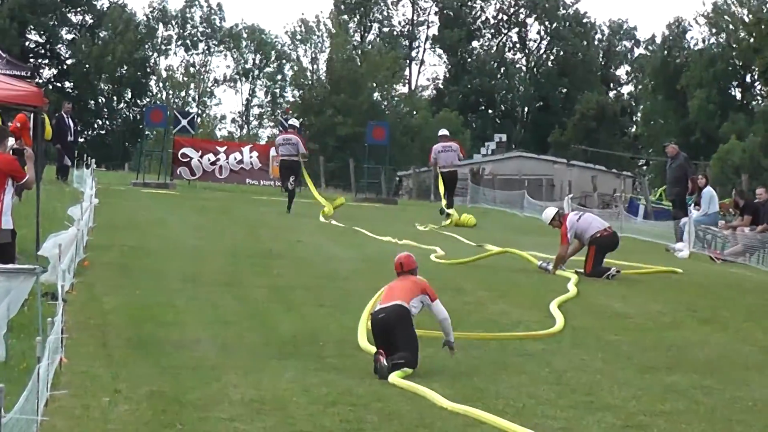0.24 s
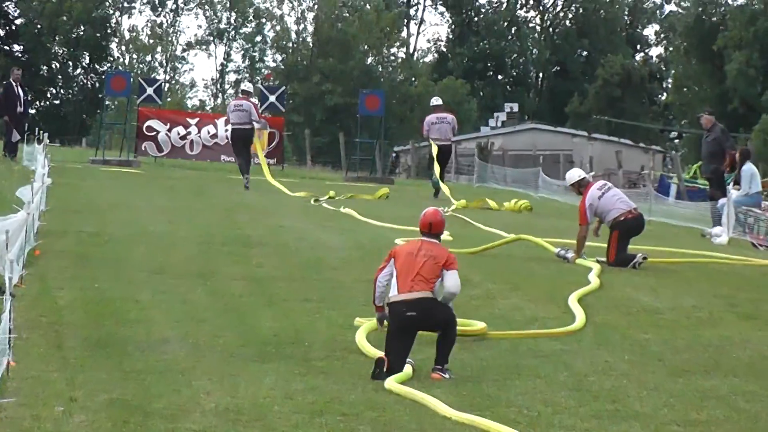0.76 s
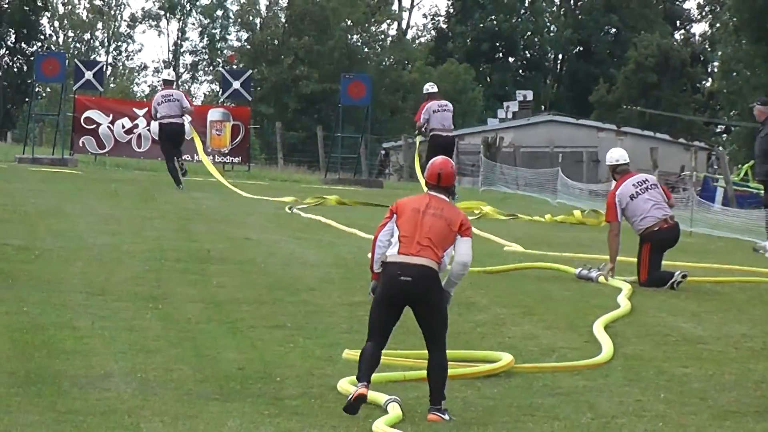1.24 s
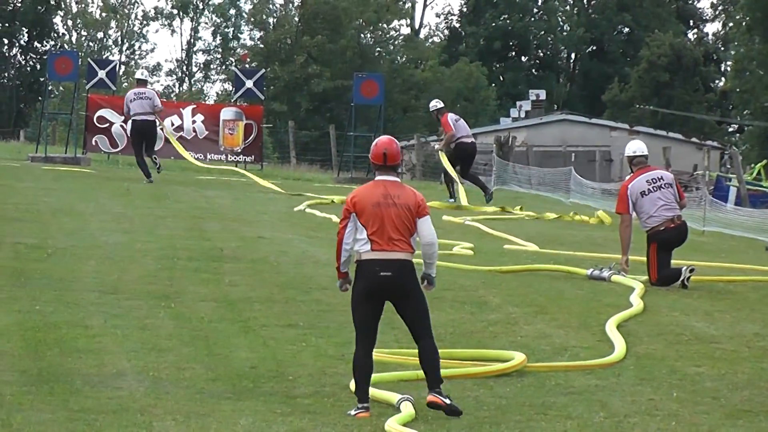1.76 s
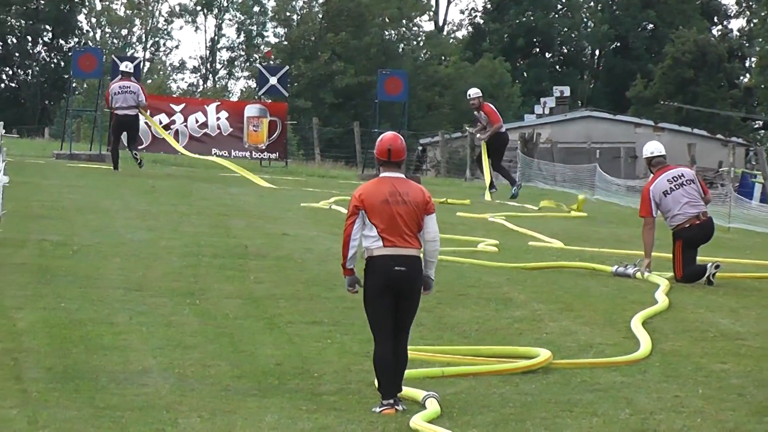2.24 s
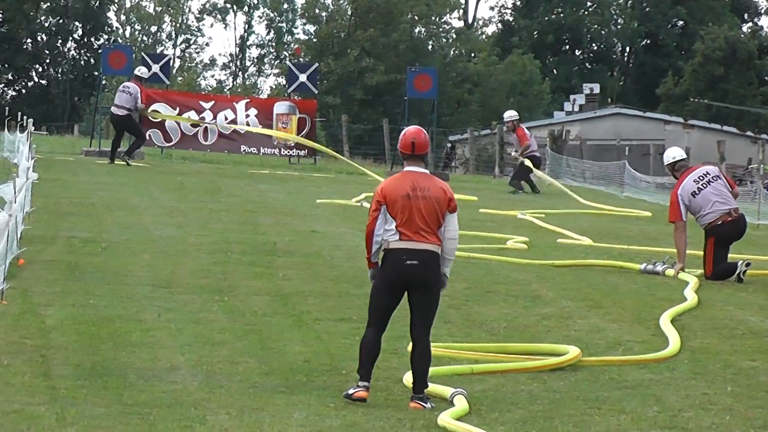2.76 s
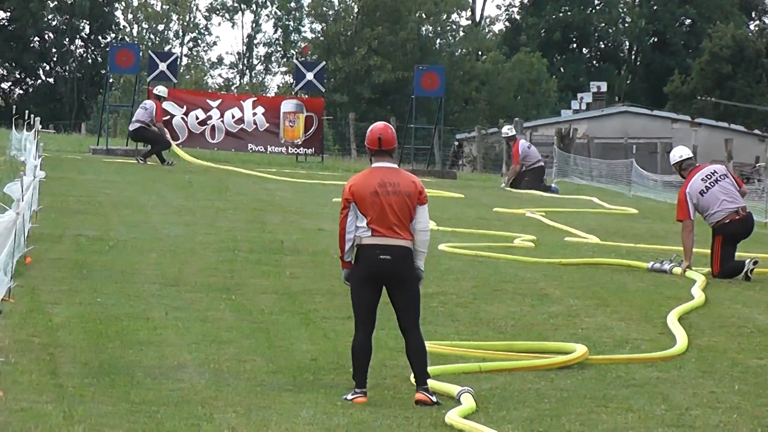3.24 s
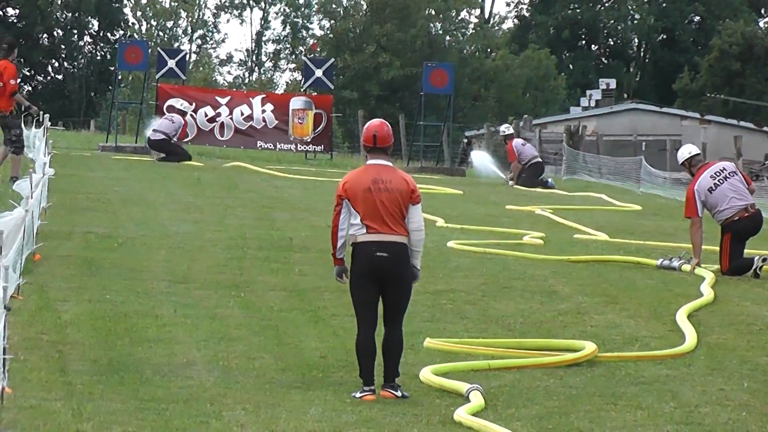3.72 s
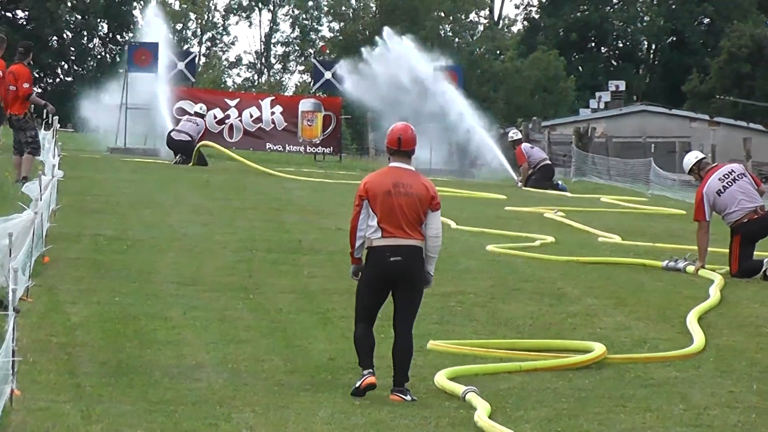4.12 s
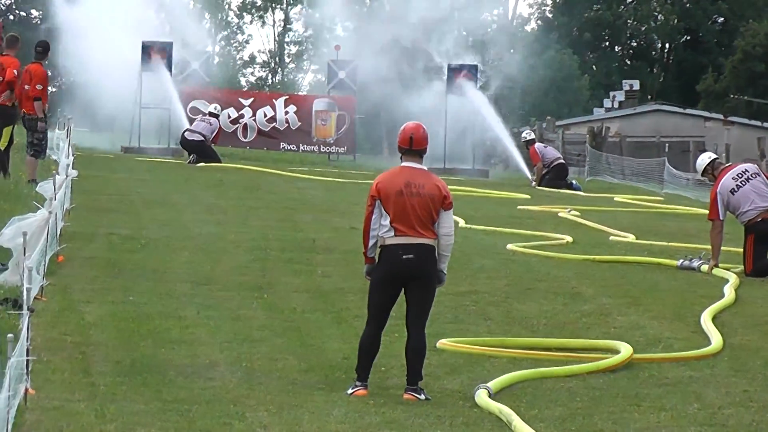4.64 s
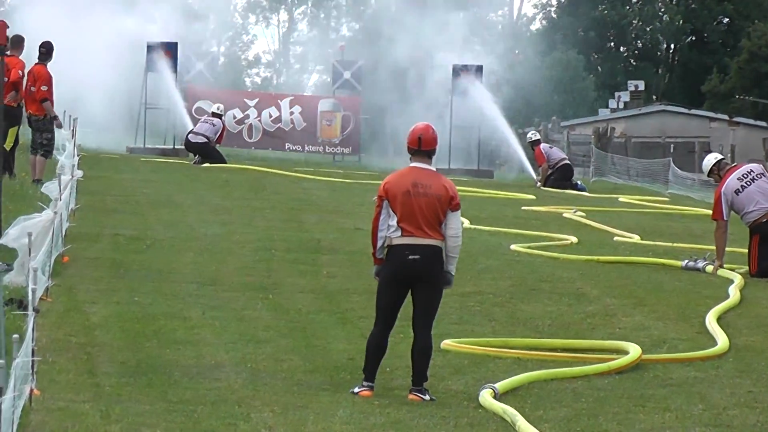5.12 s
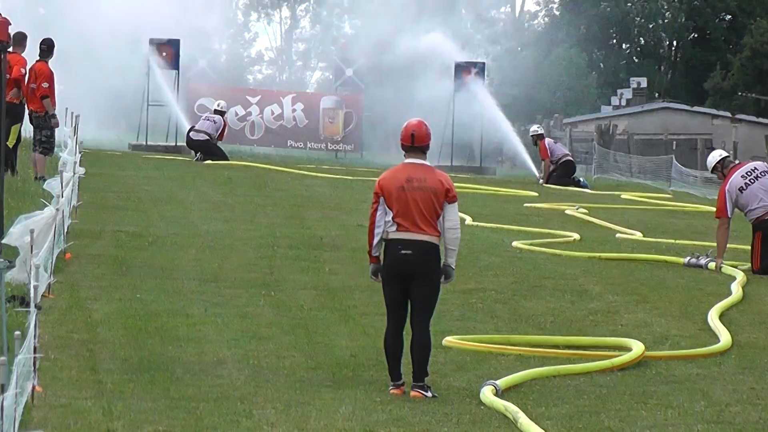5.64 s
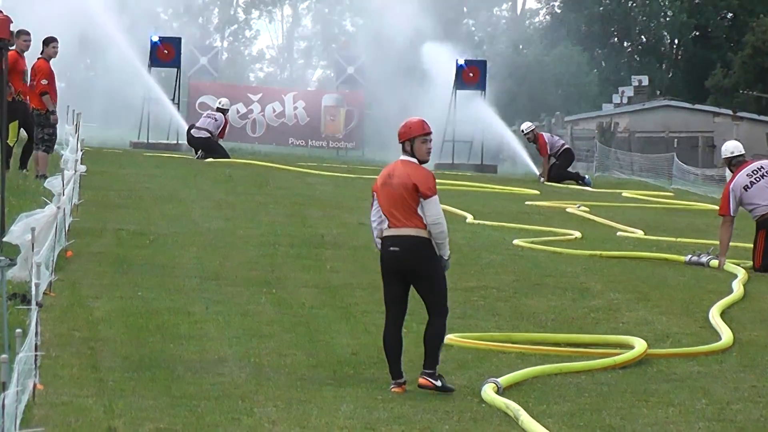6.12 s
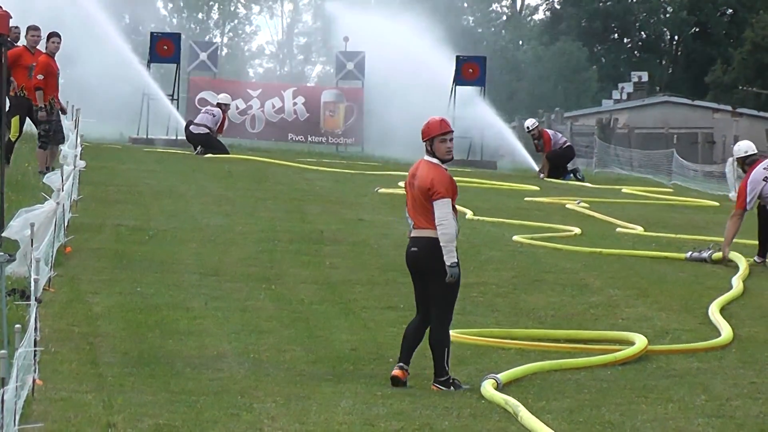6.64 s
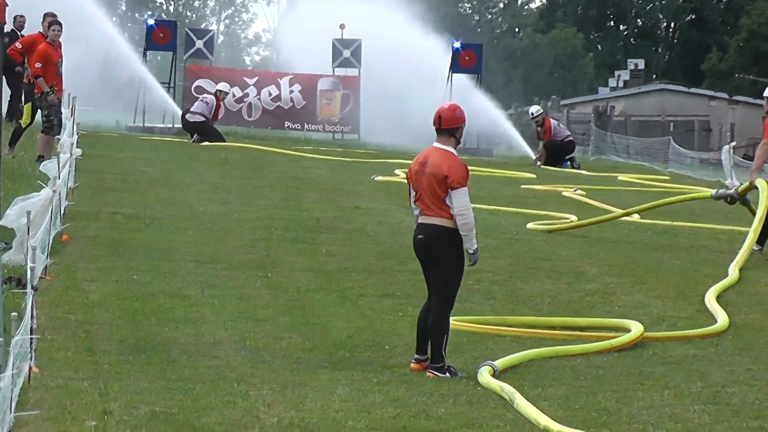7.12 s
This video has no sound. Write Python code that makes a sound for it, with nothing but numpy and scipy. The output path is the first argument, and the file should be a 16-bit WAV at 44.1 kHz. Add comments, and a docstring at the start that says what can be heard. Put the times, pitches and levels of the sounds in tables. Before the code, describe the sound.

A portable four-cylinder pump engine runs outdoors, right of a stereo microphone pair. It holds a steady, buzzing drone with crackling exhaust, then from the middle revs up into a louder, harsher roar. Near the end the throttle closes, pitch and level fall, and a couple of pops come out. Low gusty rumble and short dull thumps lie beneath.

```python
"""Four-cylinder pump engine under changing load

The engine stands to the right of a stereo microphone pair; it runs lightly loaded, revs up to run hard,
then throttles back. Each firing excites a sharp crack at the outlet and a boom in the exhaust. Every
cylinder has its own ring, so the pattern recurs every four firings. Gas hisses and fades after each crack.
Far walls echo the boom, a diffuse hiss surrounds the engine; a low rumble and short dull thumps lie beneath.
"""
import sys
import numpy as np
from scipy import signal
from scipy.fft import rfft, irfft, next_fast_len
from scipy.io import wavfile

SR = 44100
rng = np.random.default_rng(int(sys.argv[2]) if len(sys.argv) > 2 else 0)


def unload_wav(signal):
    """Save mono or channel-first audio to the path in sys.argv[1] as 16-bit WAV at rate SR, clipped to [-1, 1]."""
    wavfile.write(
        sys.argv[1],
        SR,
        np.round(np.clip(np.atleast_2d(signal).T, -1, 1) * 32767).astype(np.int16),
    )


N = 325458
SIZE = next_fast_len(N + SR)  # transform length
HZ = np.maximum(np.arange(SIZE // 2 + 1) * SR / SIZE, 1)
TIME = np.arange(N) / SR

# Low rumble, before the tilt between the sides: [t/s, level/dB]
RUMBLE = [(0, -38.5), (4.3, -44), (5.1, -36.5), (5.6, -35.5), (6.8, -34.5), (6.95, -37), (7.38, -61)]
# Strongest low thumps, before the same tilt: [t/s, peak level/dB]
THUMPS = [(0.689, -30), (1.48, -29), (1.888, -30), (2.308, -34), (3.411, -27), (4.041, -26), (4.308, -28),
          (4.846, -25), (4.903, -25), (5.122, -31), (5.161, -27), (6.139, -29), (6.463, -30), (6.882, -22)]
# Weaker thumps fall at random until the throttle is about to shut
SOFT_THUMPS_PER_S, SOFT_THUMPS_END_S = 4, 6.9
SOFT_THUMP_DB, SOFT_THUMP_SPREAD_DB = -42, 3
SIDE_TILT_DB = 1.5  # rumble and thumps: left lowered, right raised

# Firing rate: [t/s, f/Hz]
FIRING = [(0, 125.7), (.3, 125.5), (.6, 125.64), (.9, 126.23), (1.2, 126.57), (1.6, 127.15), (2, 127.49),
          (2.4, 128.01), (2.8, 128.93), (3.1, 129.55), (3.4, 130.17), (3.7, 129.59), (4, 129.09),
          (4.2, 129.67), (4.35, 130.54), (4.55, 133.61), (4.8, 137.77), (5.05, 142.13), (5.25, 146.34),
          (5.45, 149.02), (5.7, 150.86), (5.95, 151.64), (6.2, 151.63), (6.5, 152.18), (6.75, 152.57),
          (6.87, 151.23), (6.97, 149.41), (7.07, 145.75), (7.17, 142.13), (7.27, 137.46), (7.38, 132.37)]
# Engine state: [t/s, boom level/dB, load/0-1]
ENGINE = [(0, -24, 0), (0.599, -24, 0), (1.199, -24, 0), (2, -23.5, 0), (2.998, -23, 0), (3.4, -23, 0),
          (3.898, -23, 0.01), (4.25, -23, 0), (4.549, -23.5, 0.03), (5.15, -21.5, 0.42), (5.449, -21, 0.53),
          (5.699, -21, 0.6), (6.098, -21.5, 0.72), (6.748, -21, 0.58), (6.95, -22.5, 0.5),
          (7.049, -24.5, 0.74), (7.25, -27.5, 0.5), (7.38, -26.5, 0.25)]
# Each cylinder: [boom level/dB, lateness/share of a firing period, negative is early]
CYLINDERS = [(3.34, 0.0098), (2.3, 0.0092), (2.5, -0.0078), (2.5, -0.01)]
# Pops, firings much stronger than their neighbours: [t/s, strength level/dB]
POPS = [(7.306, 5), (7.366, 5)]
UNEVEN_DB = (.55, .15)  # spread from firing to firing at light and at full load
# Over this span (s) the throttle shuts: the spread rises and the crack changes colour
SHUTS_S, SHUT_UNEVEN_DB = (7.0, 7.2), .6

# Colour of the crack at light and at full load: [f/Hz, relative level/dB]
CRACK_LIGHT = [(600, -18.5), (950, -6), (1110, -17), (1250, 0.5), (1350, 5), (1450, 0.5), (1560, -2),
               (1650, -9), (2000, -8.5), (2120, -0.5), (2450, 1.5), (2600, -9.5), (2760, -12), (3150, -15),
               (3300, -7), (3750, -8), (4200, -8), (4700, -11.5), (5300, -10), (6500, -9.5), (11800, -25.5),
               (15600, -42)]
CRACK_FULL = [(600, -21), (950, 3), (1190, -17.5), (1340, 4.5), (1530, -2.5), (1640, -4.5), (2050, -5.5),
              (2250, 1), (2420, 7), (2600, -14), (2700, -18), (2880, -1.5), (3050, -13), (3300, 2),
              (3680, -12), (3950, -2), (4400, -9), (4600, -15), (4900, -2.5), (5300, -8.5), (7300, -4),
              (11800, -17.5), (15600, -29)]
CRACK_DB = (-6, -2.5)  # crack relative to the boom level at light and at full load
# At light and at full load: slip of each crack (s), its spread (dB), share of the cylinder's lateness
SLIP_S, CRACK_SPREAD_DB, LATE_SHARE = (1.2e-5, 4e-6), (.6, .3), (.4, .15)
# Rings that each cylinder drives differently, f/Hz
RING_HZ = (1600, 1800, 2300, 3500, 4200)
# One row per cylinder, one column per ring frequency, at light and at full load: [level/dB]
RINGS_LIGHT = [(2.5, 0, .5, 1, 0), (-9, -2, .3, -2, -2), (3.5, 2, -1.5, -1, 1), (-8, 0, 1, 0, 1)]
RINGS_FULL = [(1, -1, -1.5, -2, -2), (1, 3, 1, 1, 1.5), (-2, -5, 0, -1, -1), (0, 1, 1, 2, 1)]
# Colour of the mostly treble tail of a crack: [f/Hz, level/dB]
RATTLE_COLOUR = [(1600, -6), (2200, 0)]
# Frame and ground return each crack: [delay/s, level/dB]
REBOUNDS = [(.002, -9), (.0046, -8)]
REBOUND_SPREAD_S = .0003  # each cylinder's paths differ
# Colour of these rebounds: [f/Hz, level/dB]
REBOUND_COLOUR = [(1500, -12), (2300, -7), (3000, 1.5), (3600, -4), (6000, 1.5)]
# Share of the crack that is turbulent gas and never repeats: [f/Hz, level/dB]
GAS = [(900, -12), (1400, -13), (2500, -8.5), (4200, -8), (6000, -3.5), (10000, -1), (16000, -3)]
# Sheet-metal and pipe modes that every crack rings: [f/Hz, width/Hz, lift/dB]
SHELL = [(1782, 62, 7), (2453, 100, -3.5), (3213, 330, 4), (4010, 46, 9), (4200, 130, 1.5), (4340, 190, 8),
         (4840, 120, 4.5), (5620, 140, 7.5), (6180, 107, 7.5), (6600, 110, 8.5), (7360, 91, 7.5),
         (8430, 55, 9), (9340, 91, 6.5), (11600, 160, 3)]
# One further rebound wanders in delay, so the colour drifts
DRIFT_S, DRIFT_SPREAD_S, DRIFTS_PER_S, DRIFT_DB = .0011, .00004, 1.2, -14
# A broad ring of the crack that grows and recedes: [t/s, extra share, negative weakens]
BRIGHT = [(0, 0.14), (1.3, 0.27), (2.2, 0.049), (3.5, -0.045), (4.5, -0.085), (5.6, -0.041), (6.4, 0.11),
          (7.38, 0.034)]
BRIGHT_HZ, BRIGHT_WIDTH_HZ = 4500, 2400
# Colour added to the crack once the throttle is shut: [f/Hz, level/dB]
SHUT_COLOUR = [(1300, 3.5), (1800, 3.5), (2200, -5), (2800, -0.5), (4000, 0)]

# Exhaust boom at light and at full load: [f/Hz, relative level/dB]
BOOM_LIGHT = [(30, -43), (70, -21), (128, 12), (256, 18), (385, 10.5), (420, 9), (515, 19), (570, 18),
              (645, 12), (700, 14), (770, 0.5), (850, 2), (900, -2), (1050, -5), (1300, -93)]
BOOM_FULL = [(30, -48), (70, -32), (135, 11), (152, 25.5), (300, 26), (420, 13), (455, 22), (540, 25),
             (605, 25), (700, 19), (760, 17), (910, 14.5), (1060, -3.5), (1300, -52)]
BOOM_LAG_S, BOOM_RING = .0015, .1  # crack to trough; causal share of the boom's response
BOOM_SLIP_S = 1.5e-5  # random slip of each trough
# The silencer chamber holds this band back
CHAMBER_HZ, CHAMBER_WIDTH_HZ, CHAMBER_HOLD_S = 290, 120, .0007

# Far walls: [delay/s, level/dB], strongest around one band
ECHOES = [(.055, -6), (0.131, -32)]
ECHO_HZ, ECHO_WIDTH_HZ = 432, 78
# Scattered sound that differs left and right: [f/Hz, level/dB]
SCATTER = [(100, -32), (900, -26), (1500, -15), (2500, -14), (5000, -24), (9000, -20), (13000, -5)]
# Share of the engine that returns as diffuse hiss: [f/Hz, level/dB]
BLUR = [(400, -32.5), (800, -24), (1100, -9), (1400, -15), (2500, -15), (4500, -26), (8000, -24),
        (13000, -10)]
# Microphone pair: [f/Hz, left minus right level/dB]
BALANCE_DB = [(60, 0), (140, -4.5), (256, -2), (300, 0.5), (385, -8.5), (455, -9), (515, -7), (600, -4),
              (700, -8.5), (900, -7.5), (1290, -6), (2380, -7), (4400, -2), (8120, -3.5), (15000, -4.5)]
# Microphone pair: [f/Hz, phase by which left leads/rad]
LEAD = [(60, 0), (128, 0.24), (152, 0.58), (256, -0.43), (300, -0.53), (385, -1.4), (455, -1.66), (515, .1),
        (600, -0.59), (760, -0.14), (910, -0.3), (1060, -1.75), (1210, 1), (1460, 0.2), (1890, -0.4),
        (2150, -0.096), (3100, -1.3), (3450, 0.72), (4740, 0.19)]
TOP_HZ = 15780  # upper band limit


def undb(db):
    """Logarithmic measure: the amplitude ratio of a level in dB."""
    return 10 ** (np.asarray(db) / 20)


def level(x, db):
    """Normalisation: scale a signal to an rms level in dB."""
    return x * undb(db) / np.sqrt(np.mean(x ** 2))


def over_hz(table):
    """Logarithmic pitch scale: interpolate a table over log frequency."""
    hz, value = np.transpose(table)
    return np.interp(np.log(HZ), np.log(np.maximum(hz, 1)), value)


def over_time(table):
    """Slow modulation: interpolate a two-column table linearly over time."""
    return np.interp(TIME, *np.transpose(table))


def wander(rate):
    """Random modulation: normal values joined by straight lines, rate of them a second."""
    return np.interp(TIME * rate, np.arange(N), rng.standard_normal(N))


def blend(pair, load):
    """Linear interpolation between the light-load and the full-load value."""
    return pair[0] + (pair[1] - pair[0]) * load


def resonance(hz, width_hz):
    """Resonance curve: unity at the centre, one half at half the width to either side."""
    return 1 / (1 + ((HZ - hz) / width_hz * 2) ** 2)


def delay(s):
    """Shift theorem: a delay is a phase lag proportional to frequency."""
    return np.exp(-2j * np.pi * HZ * s)


def causal(db):
    """Minimum phase: the folded cepstrum makes a response ring after the blow, never before."""
    cepstrum = irfft(db * np.log(10) / 20, SIZE)
    cepstrum[1:SIZE // 2] *= 2
    cepstrum[SIZE // 2 + 1:] = 0
    return np.exp(rfft(cepstrum))


def shape(x, response):
    """Convolution theorem: filter by multiplying spectra."""
    return irfft(rfft(x, SIZE) * response, SIZE)[..., :N]


def clicks(at_s, size):
    """Band-limited impulses: windowed sinc pulses placed between samples."""
    pad = 16
    out = np.zeros(N + 64)
    at = at_s * SR + pad
    tap = np.floor(at)[:, None] + np.arange(-7, 9)
    offset = tap - at[:, None]
    pulse = np.sinc(offset) * np.cos(np.pi * offset / 16) ** 2
    np.add.at(out, tap.astype(int), size[:, None] * pulse)
    return out[pad:N + pad]


def rumble(alike=0.36, gust_db=-3.0):
    """Partial coherence: gusty low noise of which the two sides share only a part."""
    noise = rng.standard_normal((3, N))
    sides = alike * noise[0] + np.sqrt(1 - alike ** 2) * noise[1:]
    sides = sides * undb(gust_db * wander(23))
    colour = [(15, -25), (35, -20.0), (70, -16.5), (110, -12.5), (250, -20), (600, -17), (1500, -41)]
    low = shape(sides, undb(over_hz(colour)))
    return level(low, 0) * undb(over_time(RUMBLE))


def firings(load):
    """Periodic excitation: an event falls wherever the integral of the firing rate passes a whole number."""
    hz = over_time(FIRING)
    turns = np.cumsum(hz) / SR + .04
    count = np.arange(1, int(turns[-1]) + 1)
    at = np.interp(count, turns, TIME)
    period = 1 / np.interp(at, TIME, hz)
    chance = rng.standard_normal((len(at), 4))
    spread_db = blend(UNEVEN_DB, np.interp(at, TIME, load))
    spread_db = spread_db + np.interp(at, SHUTS_S, (0, SHUT_UNEVEN_DB))
    # differences of chance values: a strong burn tends to be followed by a weak one
    strength_db = spread_db * np.diff(chance[:, 0], prepend=0) / np.sqrt(2)
    for s, db in POPS:
        nearest = np.argmin(abs(at + BOOM_LAG_S - s))
        strength_db[nearest] = db
    return at, period, count % 4, strength_db, chance[:, 1:], turns % 1


def gas_hiss(phase):
    """Turbulence noise: gas hisses most just after a firing and fades until the next."""
    fade = 0.28 + .5 * np.exp(-phase / 0.5) + 0.77 * np.exp(-phase / 0.07)  # phase in firing periods
    return rng.standard_normal(N) * fade * undb(1.15 * wander(70))


def rattle(db, t60_s=0.036):
    """Exponential decay: response of a short random tail of given energy."""
    tail = rng.standard_normal(1500) * np.exp(-np.log(1000) * TIME[:1500] / t60_s)
    return rfft(undb(db) * tail / np.sqrt(np.sum(tail ** 2)), SIZE)


def cylinder_response(rattle_db=-15.0):
    """Superposition: an inverted click and its rattling tail, followed by rebounds of both."""
    rebounds = 0
    for s, db in REBOUNDS:
        path_s = s + REBOUND_SPREAD_S * rng.uniform(-0.99, 1)
        rebounds = rebounds + undb(db) * delay(path_s)
    rebounds = rebounds * causal(over_hz(REBOUND_COLOUR))
    click_and_tail = rattle(rattle_db) * causal(over_hz(RATTLE_COLOUR)) - 0.5
    return click_and_tail * (1 + rebounds)


def crack(at, period, cylinder, strength_db, chance, phase, load):
    """Impulse excitation: each blow rings its cylinder's response and the shell, amid turbulent gas."""
    light, full = 0, 0
    for k, (_, late) in enumerate(CYLINDERS):
        mine = cylinder == k
        own = cylinder_response()
        now = np.interp(at[mine], TIME, load)
        slip_s = blend(LATE_SHARE, now) * late * period[mine] + blend(SLIP_S, now) * chance[mine, 0]
        blow_db = .65 * strength_db[mine] + blend(CRACK_SPREAD_DB, now) * chance[mine, 1]
        blows = clicks(at[mine] + slip_s, undb(blow_db))
        light = light + shape(blows, own * causal(over_hz(list(zip(RING_HZ, RINGS_LIGHT[k])))))
        full = full + shape(blows, own * causal(over_hz(list(zip(RING_HZ, RINGS_FULL[k])))))
    gas = level(gas_hiss(phase), 0)
    gas_share = np.minimum(undb(over_hz(GAS)), .99)
    shell_db = sum(db * resonance(hz, width) for hz, width, db in SHELL)
    out = 0
    for rings, colour, weight in ((light, CRACK_LIGHT, 1 - load), (full, CRACK_FULL, load)):
        # the two shares add up in power
        both = shape(level(rings, 0), np.sqrt(1 - gas_share ** 2)) + shape(gas, gas_share)
        out = out + weight * level(shape(both, causal(over_hz(colour) + shell_db)), 0)
    return throttle_colour(bright_ring(drifting_rebound(out)))


def drifting_rebound(x):
    """Comb interference: a copy of wandering delay moves the peaks and dips of the spectrum."""
    delay_s = DRIFT_S + DRIFT_SPREAD_S * wander(DRIFTS_PER_S)
    return x + undb(DRIFT_DB) * np.interp(TIME - delay_s, TIME, x)


def bright_ring(x):
    """Resonance: one broad band is added or withdrawn by a share that varies in time."""
    return x + over_time(BRIGHT) * shape(x, resonance(BRIGHT_HZ, BRIGHT_WIDTH_HZ))


def throttle_colour(x):
    """Spectral colouring: crossfade to another filter as the throttle shuts."""
    shut = np.interp(TIME, SHUTS_S, (0, 1))
    return (1 - shut) * x + shut * shape(x, causal(over_hz(SHUT_COLOUR)))


def boom(at, period, cylinder, strength_db, chance, load):
    """Pulse in a pipe: a nearly symmetric trough follows each crack, timed by unequal manifold lengths."""
    own_db, late = np.array(CYLINDERS)[cylinder].T
    trough_s = at + BOOM_LAG_S + late * period + BOOM_SLIP_S * chance[:, 2]
    blows = clicks(trough_s, -undb(strength_db + own_db))
    held_s = CHAMBER_HOLD_S * np.exp(-((HZ - CHAMBER_HZ) / CHAMBER_WIDTH_HZ) ** 2)
    blows = shape(blows, delay(held_s))
    out = 0
    for table, weight in ((BOOM_LIGHT, 1 - load), (BOOM_FULL, load)):
        db = over_hz(table)
        # part minimum phase, the rest zero phase
        response = causal(BOOM_RING * db) * undb((1 - BOOM_RING) * db)
        out = out + weight * level(shape(blows, response), 0)
    return out


def diffuse_hiss(engine, engine_db):
    """Diffuse field: random phases, unrelated left and right, smear the engine into a hiss at its level."""
    blur = np.exp(2j * np.pi * rng.random((2, len(HZ)))) * undb(over_hz(BLUR))
    return shape(engine / undb(engine_db), blur) * undb(engine_db)


def scatter(t60_s=.3):
    """Scattering: grass, people and fences return a decaying tail that differs left and right."""
    t = np.arange(SR // 2) / SR
    tail = rng.standard_normal((2, len(t))) * np.exp(-np.log(1000) * t / t60_s)
    tail = tail / np.sqrt(np.sum(tail ** 2, axis=1, keepdims=True))
    return rfft(tail, SIZE) * undb(over_hz(SCATTER))


def walls(x):
    """Reflection: late copies of the boom beat against the direct sound as the revs move."""
    echoes = sum(undb(db) * delay(s) for s, db in ECHOES)
    return shape(x, resonance(ECHO_HZ, ECHO_WIDTH_HZ) * echoes)


def thumps():
    """Impulse response: short dull thumps, some at set times and weaker ones at random."""
    push = undb(over_hz([(15, -25), (35, -2), (80, .1), (200, -10), (600, -20), (1500, -60)]))
    push = push / np.max(abs(irfft(push, SIZE)))  # unit peak
    count = int(SOFT_THUMPS_PER_S * SOFT_THUMPS_END_S)
    soft_at = rng.uniform(0, SOFT_THUMPS_END_S, count)
    soft_db = SOFT_THUMP_DB + SOFT_THUMP_SPREAD_DB * rng.standard_normal(count)
    at, peak_db = np.r_[THUMPS, np.c_[soft_at, soft_db]].T
    return shape(clicks(at, undb(peak_db)), push)


def scene():
    """Binaural differences: engine and echoes reach two microphones with unlike level and phase."""
    t, boom_db, load = np.transpose(ENGINE)
    boom_db, load = np.interp(TIME, t, boom_db), np.interp(TIME, t, load)
    at, period, cylinder, strength_db, chance, phase = firings(load)
    cracks = crack(at, period, cylinder, strength_db, chance, phase, load)
    cracks = cracks * undb(boom_db + blend(CRACK_DB, load))
    low = boom(at, period, cylinder, strength_db, chance, load) * undb(boom_db)
    engine = cracks + low + walls(low)
    # each side takes half of the level and phase difference
    half = undb(over_hz(BALANCE_DB) / 2) * np.exp(.5j * over_hz(LEAD))
    sides = shape(engine, np.array([half, 1 / half]) * (1 + scatter()))
    low_layer = (rumble() + thumps()) * undb([[-SIDE_TILT_DB], [SIDE_TILT_DB]])
    return sides + diffuse_hiss(engine, boom_db) + low_layer


def record(dry):
    """Band limitation: a high-pass cuts the deepest bass and a steep low-pass cuts the top."""
    dry = signal.sosfilt(signal.butter(2, 18, "high", fs=SR, output="sos"), dry)
    return signal.sosfilt(signal.ellip(16, .2, 80, TOP_HZ, fs=SR, output="sos"), dry)


dry = scene()
out = record(dry)
unload_wav(out)
```